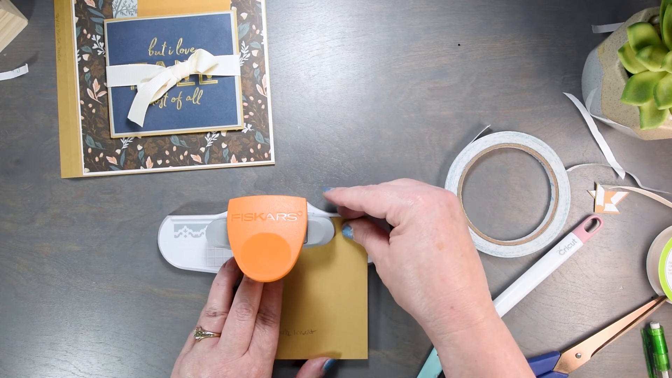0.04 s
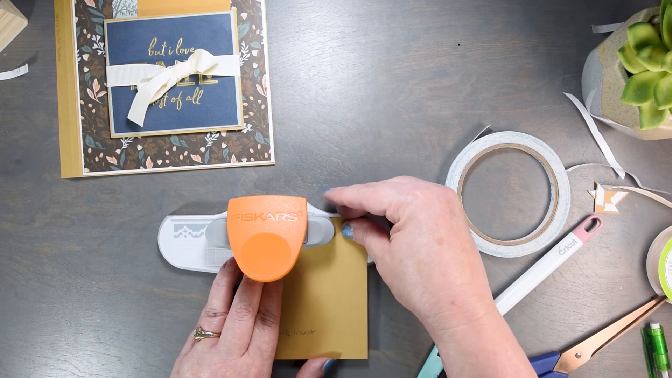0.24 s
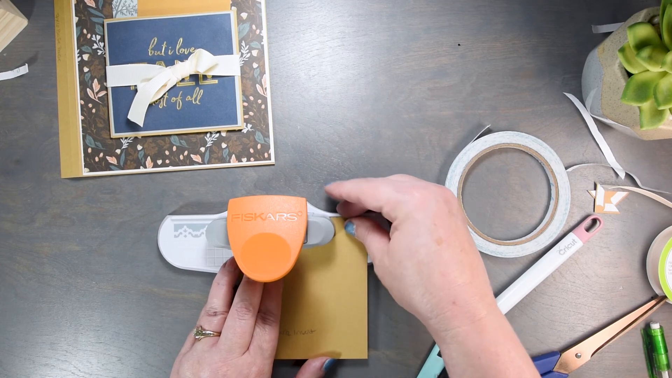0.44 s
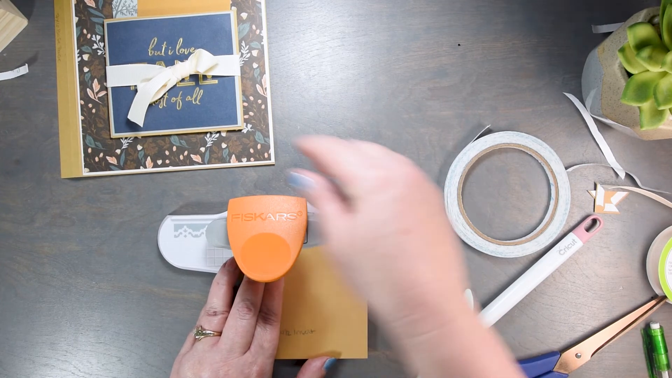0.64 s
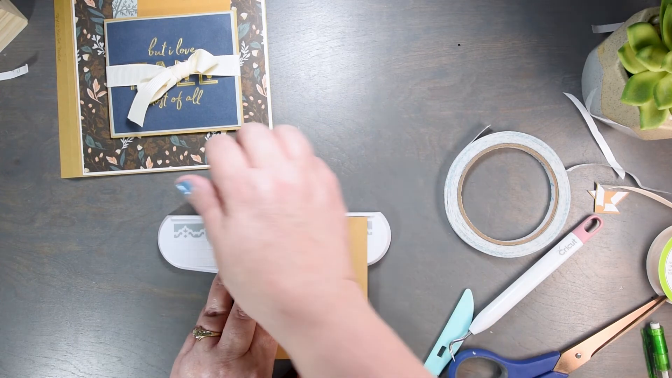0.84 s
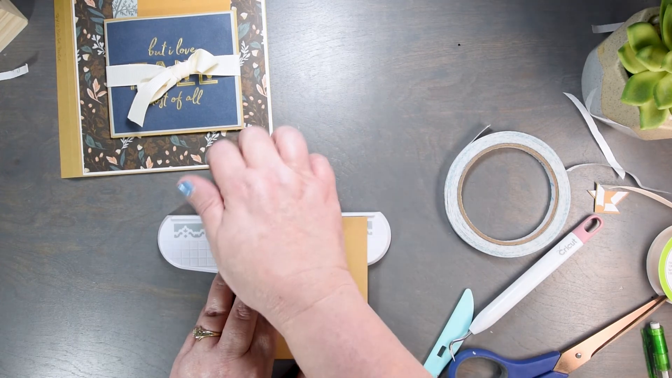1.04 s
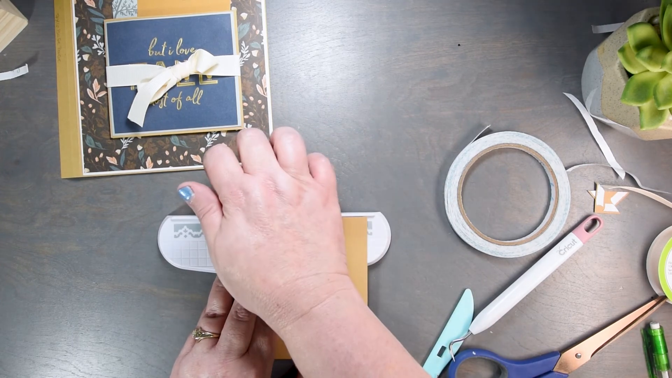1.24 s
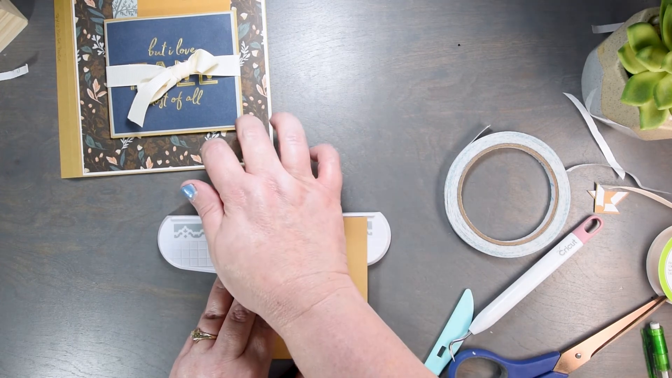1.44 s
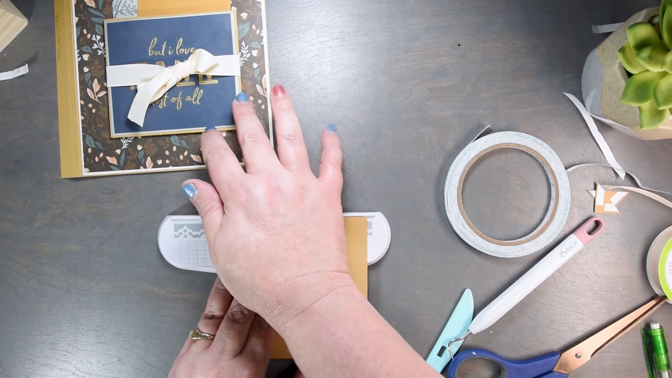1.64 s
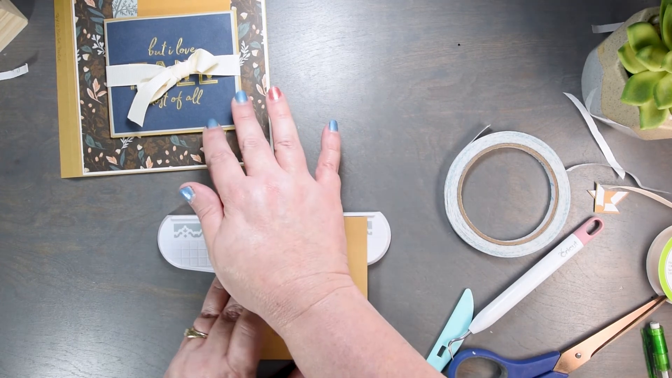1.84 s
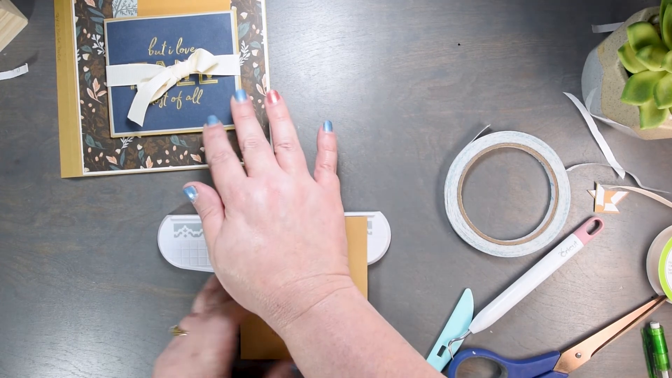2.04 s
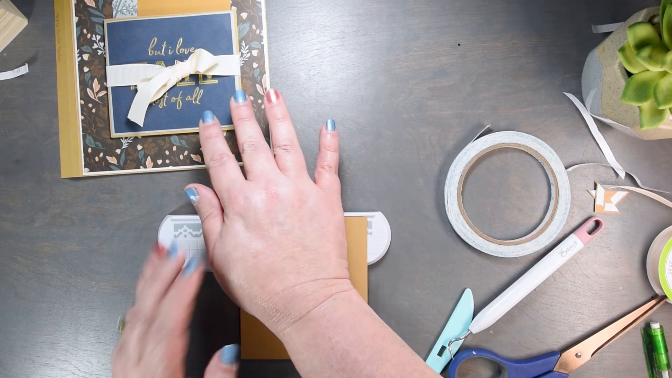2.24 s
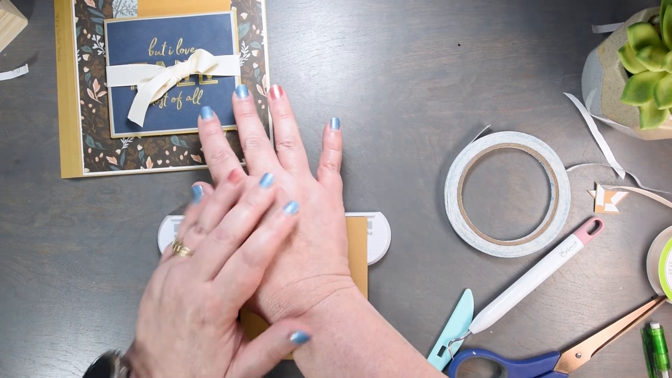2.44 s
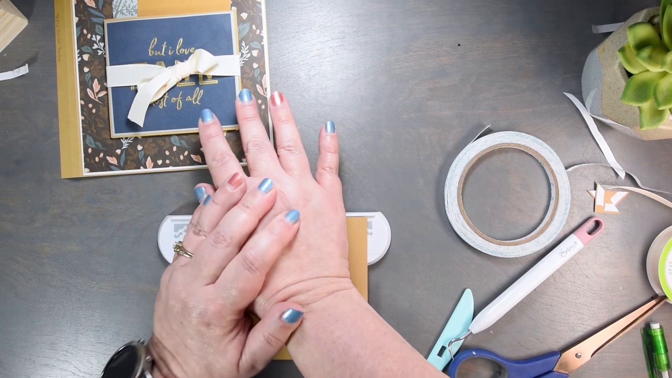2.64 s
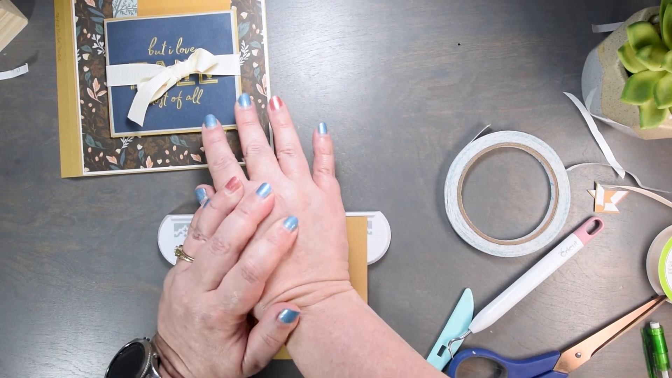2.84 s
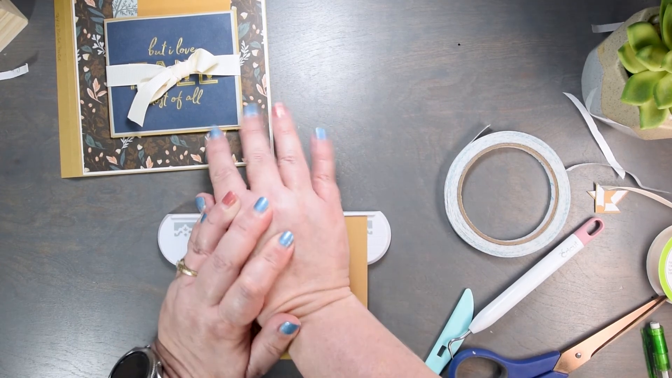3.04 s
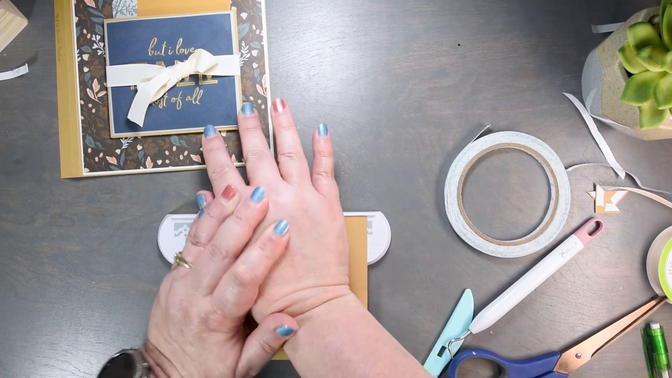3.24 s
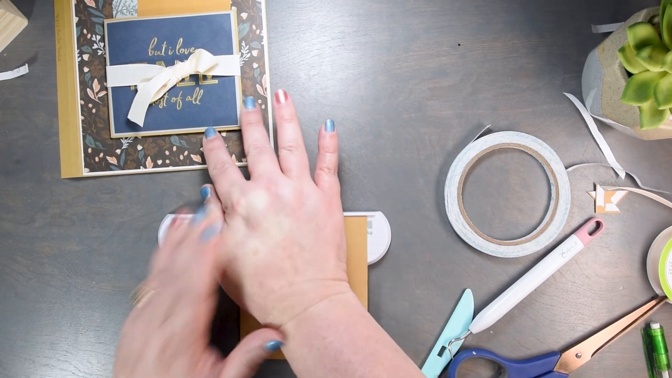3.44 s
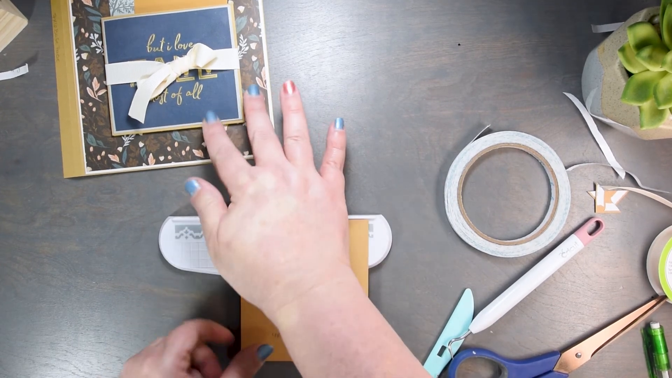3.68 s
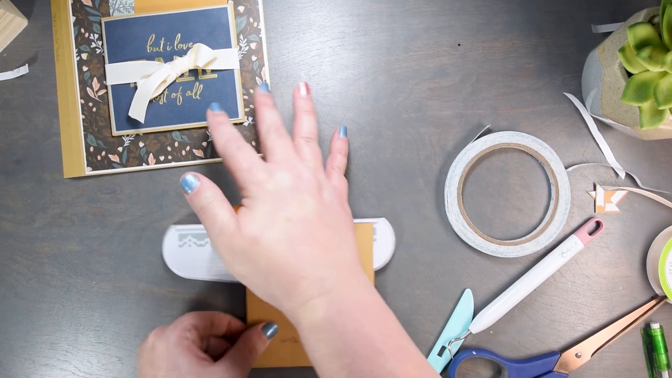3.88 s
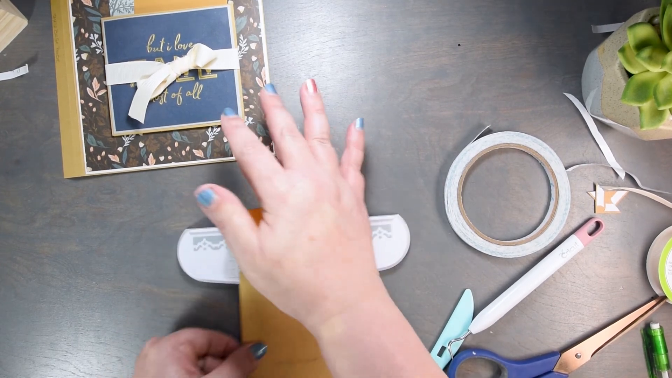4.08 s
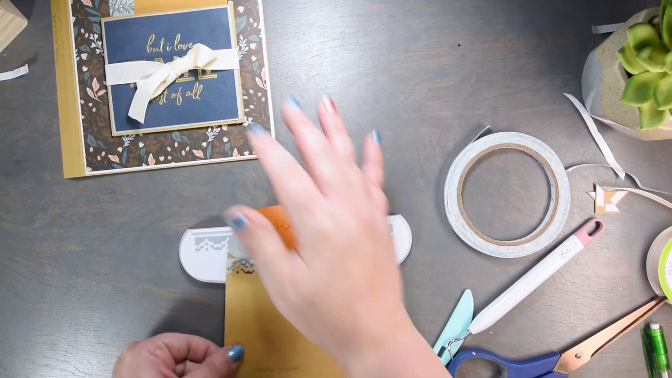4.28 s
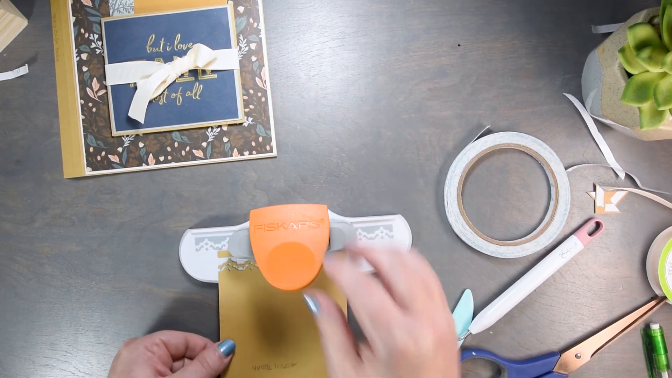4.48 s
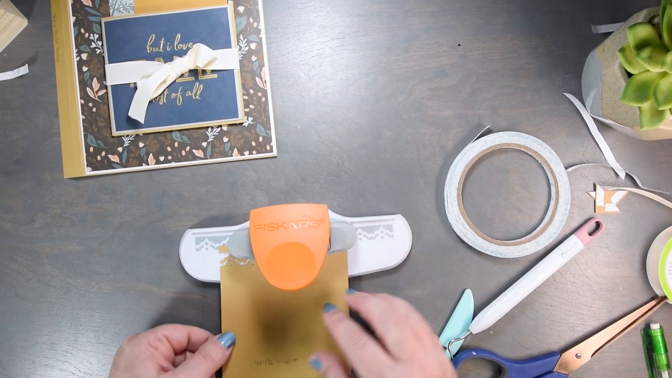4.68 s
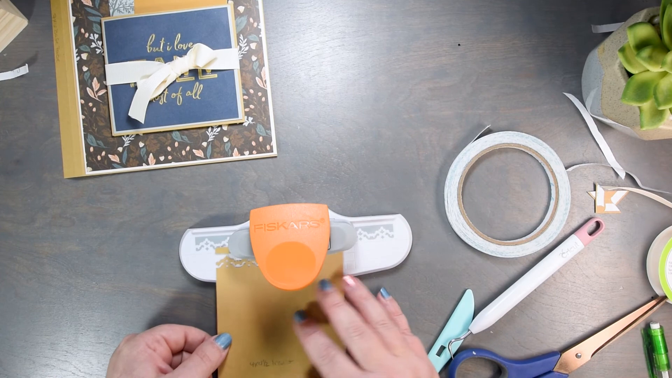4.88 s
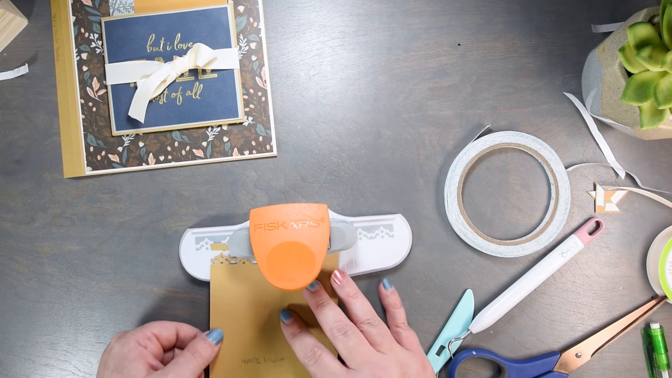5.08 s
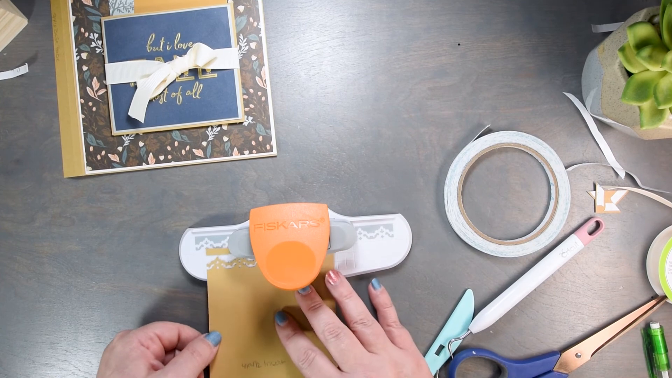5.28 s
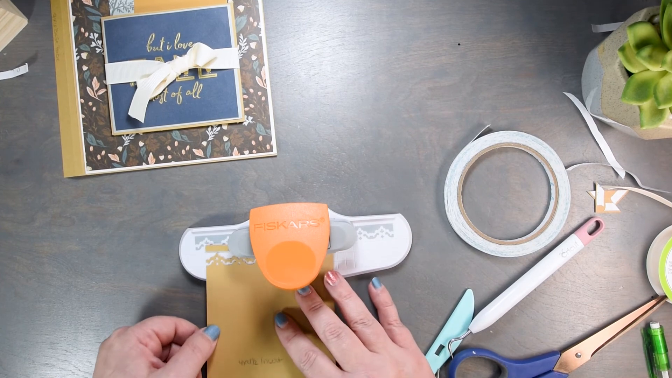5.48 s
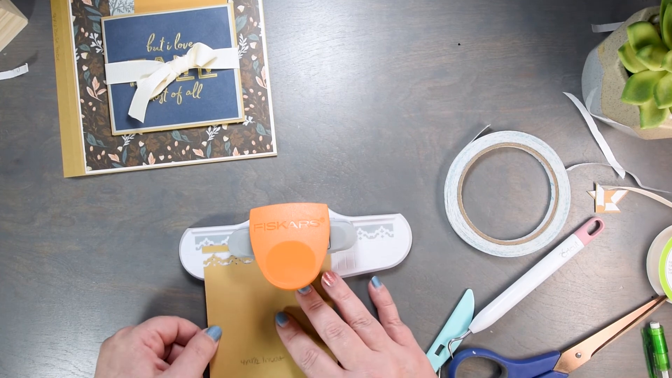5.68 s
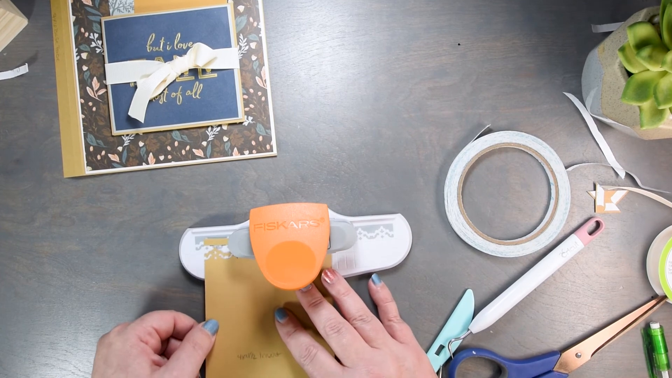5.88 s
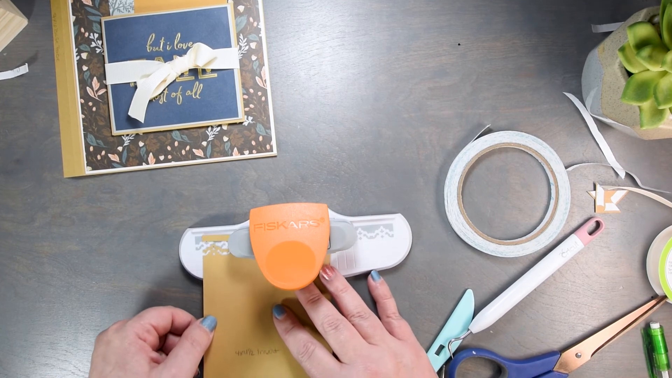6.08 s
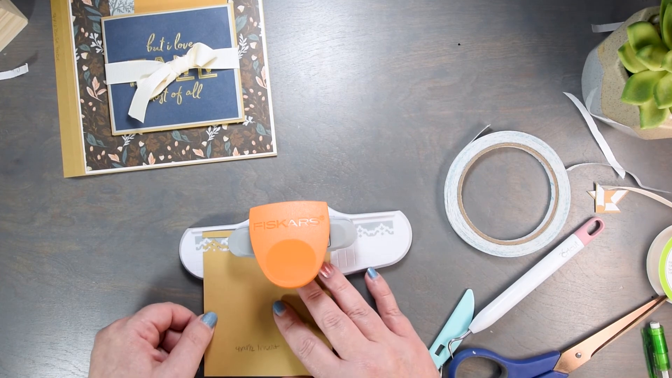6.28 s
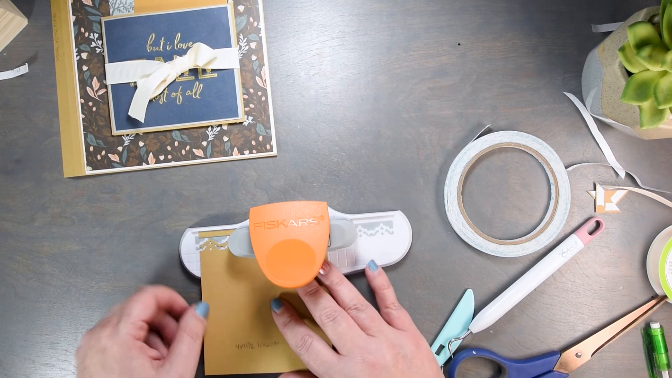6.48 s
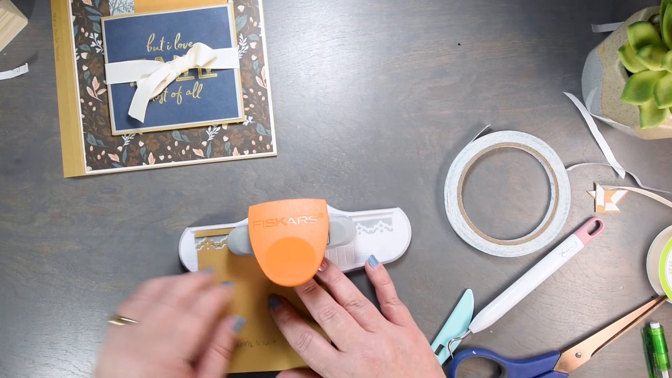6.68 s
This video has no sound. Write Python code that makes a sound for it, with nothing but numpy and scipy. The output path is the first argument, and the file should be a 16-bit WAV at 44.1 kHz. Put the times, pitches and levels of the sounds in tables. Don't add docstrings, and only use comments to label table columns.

```python
import sys
import numpy as np
from scipy import signal
from scipy.fft import rfft, irfft
from scipy.io import wavfile
from scipy.ndimage import uniform_filter1d

SR = 44100
rng = np.random.default_rng(int(sys.argv[2]) if len(sys.argv) > 2 else 0)


def dump(signal):
    limited = np.clip(np.atleast_2d(signal).T, -1, 1)
    pcm = np.round(limited * 32767).astype(np.int16)
    wavfile.write(sys.argv[1], SR, pcm)


def decibels_to_gain(level_db):
    exponent = np.asarray(level_db, float) / 20
    return 10 ** exponent


N = 296352
CONTROL_STEP = 32

# frequency in Hz, width in Hz, level in dB.
TABLE_MODES = [(136, 18, -10.5), (180.7, 32, 1), (212, 67, -1), (296, 11, -7)]
# frequency in Hz, width in Hz, level in dB.
BASE_MODES = [(364, 89, -7), (508.7, 53, -0.5), (591, 64, -2.5), (732, 83, -4), (859, 45, -2.5),
              (993, 140, -7), (1190, 93, -1.5), (1346, 170, -4)]
# frequency in Hz, width in Hz, level in dB.
DIE_MODES = [(1616, 230, -3), (1820, 150, 0), (1980, 170, -1.5), (2350, 180, -2), (2570, 140, -3.5),
             (2904, 160, 0), (3537, 220, -4), (3680, 300, -5)]


def unit(x):
    return x / np.sqrt(np.mean(x ** 2))


def ring(x, modes, spread_db=0., turn=-1):
    f = np.fft.rfftfreq(len(x), 1 / SR)
    spread_db = spread_db + np.zeros(len(modes))
    body = 0
    for k, ((hz, width_hz, db), extra_db) in enumerate(zip(modes, spread_db)):
        loss = 1j * f * width_hz
        body = body + turn ** k * decibels_to_gain(db + extra_db) * loss / (hz ** 2 - f ** 2 + loss)
    return irfft(rfft(x) * body, len(x))


def walk(rate_hz):
    hold = int(SR / rate_hz)
    steps = np.repeat(rng.standard_normal(N // hold + 1), hold)
    return 1.3 * uniform_filter1d(uniform_filter1d(steps, hold), hold)[:N]


def band(lo_hz, hi_hz, size=N):
    sos = signal.butter(2, [lo_hz, hi_hz], "band", fs=SR, output="sos")
    return unit(signal.sosfilt(sos, rng.standard_normal(size)))


def swell(at_s, rise_s, fall_s, db, roundness=1):
    t = np.arange(0, N, CONTROL_STEP) / SR - at_s
    away = np.where(t < 0, -t / max(rise_s, .003), t / max(fall_s, .003))
    return decibels_to_gain(2 * (db - 20 * away ** roundness))


def smooth(control):
    return np.interp(np.arange(N), np.arange(0, N, CONTROL_STEP), control)


def knocks(events, crunch_ms, favour_db, lean_db, dull_db, gains_db):
    # frequency in Hz, width in Hz, level in dB.
    crack_modes = [(4410, 500, 3.5), (5270, 590, 1.5), (6090, 900, -0.5), (7320, 1300, -3.5),
                   (8880, 1400, -5.5), (11573, 1400, -13), (14500, 3500, -14.5)]
    size, thud_ms = 8192, 1.5
    seam_hz, seam_octaves = 1600, 0.19
    out = np.zeros((2, N + size))
    t = np.arange(size) / SR
    push = np.minimum(t / .0004, 1) * np.exp(-t / crunch_ms * 1000)
    highpass = signal.butter(4, 140., "high", fs=SR, output="sos")
    thrust = -signal.sosfilt(highpass, t * np.exp(-t / thud_ms * 1000))
    impulse = 1. * (t == 0)
    fade = np.clip((.17 - t) / .04, 0, 1)
    for s, body_db, crack_db, table_db, favour_hz in events:
        side_db = lean_db * np.tanh(np.log2(seam_hz / favour_hz) / seam_octaves)
        levels_db = crack_db, table_db, body_db + side_db, body_db - side_db
        snaps = push * rng.standard_normal(size) * decibels_to_gain(3. * rng.exponential(size=size))
        start = int(s * SR)
        bodies = crack_modes, TABLE_MODES, BASE_MODES, DIE_MODES
        for modes, db, gain_db in zip(bodies, levels_db, gains_db):
            mode_hz = np.array(modes)[:, 0]
            spot_db = favour_db * np.exp(-(np.log(mode_hz / favour_hz) / .15) ** 2)
            if modes is DIE_MODES:
                spot_db -= dull_db * np.maximum(np.log2(mode_hz / max(favour_hz, seam_hz)), 0)
            if modes is TABLE_MODES:
                hit = ring(thrust, modes, turn=0.98)
            else:
                hit = ring(snaps, modes, spot_db)
            hit *= decibels_to_gain(db + gain_db) / np.abs(hit).max()
            around = unit(ring(impulse, modes, spot_db / 2)) * np.sqrt(np.mean(hit ** 2))
            out[:, start:start + size] += np.array([hit, around]) * fade
    return out[:, :N]


def die_slips():
    # start in s, punch body level in dB, crack peak in dB, table level in dB, favoured ring in Hz.
    slips = [(0.9497, -32.5, -38, -36, 1233), (1.1471, -28, -33, -27.5, 1702),
             (1.3737, -18, -17.5, -15.5, 1287), (1.9743, -2, 0.5, -16.5, 1218),
             (2.2183, -37.5, -28, -51, 482), (2.5895, -23, -12.5, -23.5, 2381), (2.8264, -8, -2, -14, 850),
             (3.0439, -1, -3, -11, 3000), (3.0465, -4, 7.5, -8, 2380), (3.0523, 0.5, -3, -9.5, 1153),
             (3.0634, -4.5, -5.5, -14.5, 861.4),
             (3.041, -24, -24, -40, 1502),
        (3.042, -16, -16, -39.5, 2423),
    ]
    return knocks(slips, 4.2, 9.8, 1.5, 1.2, (1.5, 10.5, 6.8, 10.))


def press_ticks():
    # start in s, punch body level in dB, crack peak in dB, table level in dB, favoured ring in Hz.
    ticks = [
        (0.4635, -71.5, -67, -75, 2880),
        (0.585, -58, -77, -60, 2270),
        (1.0968, -61, -64, -51.5, 1920),
        (1.5804, -56, -52, -47.5, 1944),
        (1.6402, -49, -44, -48, 423),
        (1.6592, -46, -41, -46.5, 480),
        (1.8259, -61, -35.5, -71, 3010),
        (2.7253, -54, -41.5, -57, 479.4),
        (2.7545, -54, -54, -55.5, 611),
    ]
    return knocks(ticks, 1.4, 13.0, 4., 1.2, (-1.5, 1.0, 5.5, 8.0))


def handling_taps():
    # start in s, punch body level in dB, crack peak in dB, table level in dB, favoured ring in Hz.
    taps = [(3.5192, -59, -57, -54, 607), (3.6741, -54, -54.5, -42.5, 1440), (3.72, -50, -43.5, -47, 1294),
            (3.7695, -47.5, -66, -54, 1426), (3.858, -39, -63.5, -55, 1190),
            (3.9102, -41, -55.5, -52, 1190), (4.7328, -42.5, -64, -69, 1273), (5.0593, -65, -72, -71, 403),
            (5.1706, -39, -32.5, -68.5, 2140), (5.3451, -53.5, -59, -78, 1370),
            (5.4494, -64, -68, -69.5, 1330), (5.5198, -62, -69, -76.5, 1530), (5.862, -57.5, -66, -65, 701),
            (6.2277, -59.5, -64, -71, 1026), (6.3445, -54, -61, -74, 826), (6.6214, -68, -68.5, -68, 810)]
    return knocks(taps, 3.01, 11.0, 4.48, 9.7, (-2.0, 1.0, 4.0, 8.5))


def spring(blows, paper):
    # frequency in Hz, width in Hz, level in dB.
    coil_modes = [(1882, 4.5, -1.5), (3046, 3, -.6), (3325, 5, -7), (5150, 9, -9)]
    struck_until_s = 3.0
    t = np.arange(N) / SR
    held = np.interp(t, [.9, 1.0, 3.85, 3.95], [0, 1, 1, 0])
    struck = decibels_to_gain(-9) * blows * (t < struck_until_s)
    rubbed = decibels_to_gain(1.5) * held * paper
    return ring(struck + rubbed, coil_modes)


def movements():
    # fastest at s, rise of 20 dB in s, fall of 20 dB in s,
    # sheet level in dB, fibre hiss over the sheet in dB.
    glides = [(.125, -0.56, .03, -70, -17), (.476, -0.21, .03, -73.5, 13), (.59, -1, .1, -63, -12),
              (.75, -0.3, 0.11, -77, -4.5), (1.815, 0.36, .04, -61, -5.5), (1.92, -0.25, .08, -67, -6),
              (2.38, -0.07, .1, -68, -8), (3.545, 0.13, .2, -58.5, -5), (3.66, 0.2, 0.0856, -57, -6),
              (4.088, 0.0964, .12, -36.5, -4.5), (4.17, 0.29, 0.0744, -51, -5), (4.44, 0.06, .046, -53, -9),
              (4.6, .12, .15, -68, -11), (4.89, -0.05, 0.1007, -61.5, -15), (4.985, .05, 0.0395, -55.5, -7),
              (5.185, 0.04, 0.0502, -58, -9), (5.25, 0.2, .07, -62, -11),
              (5.36, 0.06, 0.1193, -61.5, -12.5), (5.683, 0.01, 0.0544, -48, -5), (5.84, 0.1, .1, -63, -11),
              (6.08, 0.37, .15, -65.5, -14.5), (6.4, -0.16, 0.067, -63, -9.5), (6.497, 0.1, .062, -48, -16),
              (6.71, -0.02, .1, -54.5, -18.5)]
    # fastest at s, rise of 20 dB in s, fall of 20 dB in s,
    # sheet level in dB, table drone over the sheet in dB.
    drags = [(1.5, 0.7, .3, -61.5, 8), (1.657, -0.23, 0.1, -62, 8), (2.299, 0.8, .5, -71.5, -4.5),
             (2.74, -0.37, 0.32, -62.5, -0.5), (3.01, 0.28, 0.076, -60, 8.5), (3.3, -0.4, 0.14, -61.5, 1),
             (3.42, 0.07, .2, -70, 7.5), (3.59, 0.23, 0.17, -60, 10.5), (3.68, 0.13, .05, -56, 3),
             (3.77, 0.19, .05, -62, -9), (3.866, 0.29, 0.039, -53, -10), (3.915, 0.24, 0.081, -53.5, -3.5),
             (3.96, -0.3, 0.15, -53, -10), (4.14, 0.28, .11, -52.5, -1), (4.746, 0.16, 0.056, -54, -20),
             (4.79, -0.3, .07, -60.5, -6), (4.9, 0, 0.16, -69.5, 6), (5.165, 0.85, .011, -65.5, -11.5),
             (5.45, 0.27, .25, -65.5, -3.5), (5.8, -0.14, 0.067, -65, -16),
             (6.235, .025, 0.0504, -61.5, -13.5), (6.35, 0.1, 0.09, -56.5, -0.5),
             (6.64, 0.38, 0.097, -70, -11)]
    # lets go at s, rise of 20 dB in s, sheet level in dB, favoured ring in Hz.
    loads = [
        (.92, -2, -88, 1600),
        (1.96, 0.23, -67, 2400),
        (2.571, 0.11, -59, 2570),
        (2.821, 0.0859, -41, 2370),
        (3.04, 0.0216, -30.5, 1916),
    ]
    # fastest at s, rise of 20 dB in s, fall of 20 dB in s, base level in dB.
    scuffs = [
        (1.67, 0.1, 0.041, -58),
        (4.755, 0.07, 0.069, -54),
        (5.13, 0.36, .04, -66),
        (5.42, -0.14, .06, -63.5),
        (5.89, -0.05, 0.062, -57),
        (6.18, 0.3, 0.021, -66.5),
        (6.235, -0.13, 0.039, -66),
        (6.352, -0.04, 0.037, -56),
        (6.62, -0.62, 0.039, -65),
    ]
    drag_hz, roundness = 1400, 1.8
    moves = []  # (power, fibres, base and table over the sheet in dB, ring in Hz)
    for s, up_s, down_s, db, hiss_db in glides:
        moves.append((swell(s, up_s, down_s, db, roundness), (hiss_db, -18, -26), 2098))
    for s, up_s, down_s, db, drone_db in drags:
        moves.append((swell(s, up_s, down_s, db), (-16.5, -2.5, drone_db), drag_hz))
    for s, up_s, db, hz in loads:
        moves.append((swell(s, up_s, 0.014, db), (-9, 3, 8), hz))
    sheet_db, fibre_db, table_db = -12, -30, -12
    scuff_over_db = fibre_db - sheet_db, -sheet_db, table_db - sheet_db
    for s, up_s, down_s, db in scuffs:
        moves.append((swell(s, up_s, down_s, db + sheet_db, roundness), scuff_over_db, drag_hz))
    rest_hz = 1900
    rest = decibels_to_gain(2 * np.array((-82.5, -91, -85, -86)))[:, None]
    power = rest + sum(p * decibels_to_gain(2 * np.array([0, *over_db]))[:, None] for p, over_db, _ in moves)
    ring_hz = (rest[0] * rest_hz + sum(p * hz for p, _, hz in moves)) / power[0]
    return [smooth(np.sqrt(p)) for p in power], smooth(ring_hz)


def slides():
    # frequency in Hz, width in Hz, level in dB.
    sheet_modes = [(1040, 280, -5), (1630, 270, -4.5), (2113, 140, -2), (2668, 260, -5), (3200, 240, -2),
                   (3920, 700, -7), (4570, 460, -14)]
    # frequency in Hz, width in Hz, level in dB.
    fibre_modes = [(5060, 1300, -1), (7750, 1000, 1), (8820, 580, -2.5), (13500, 2600, -13)]
    levels, ring_hz = movements()
    drag = decibels_to_gain(2.6 * walk(70) + 0.96 * walk(200))
    grains = []
    for _ in range(4):
        noise = rng.standard_normal(N)
        grains.append(noise * decibels_to_gain(2.2 * rng.exponential(size=N) + 1.2 * walk(25)) * drag)
    crisp = (levels[1] / levels[0] / decibels_to_gain(-6.5)) ** .7
    sheet, power = 0, 0
    for k, mode in enumerate(sheet_modes):
        hz, width_hz, db = mode
        gain = decibels_to_gain(db + 7.5 * np.exp(-(np.log(hz / ring_hz) / 0.21) ** 2))
        if hz > 2800:
            gain = gain * crisp
        sheet = sheet + (-1) ** k * gain * ring(grains[0], [mode]) / decibels_to_gain(db)
        power = power + gain ** 2 * width_hz
    sheet = sheet / np.sqrt(power)
    others = [ring(x, m) for x, m in zip(grains[1:], (fibre_modes, BASE_MODES, TABLE_MODES))]
    return sum(g * unit(x) for g, x in zip(levels, [sheet] + others))


def room(x):
    # frequency in Hz, level in dB, t60 in s.
    echo = [(60.02, -6, .4), (150, -8, 0.17), (357, -2.5, 0.22), (850, 2, 0.25), (1819, 1.5, 0.26),
            (4070, 0.5, 0.23), (7740, 3, 0.21), (15090, -3, 0.14)]
    t = np.arange(SR // 2) / SR
    echo_hz, echo_db, echo_t60_s = np.transpose(echo)
    answer = 0
    for hz in 70 * 2 ** np.arange(0, 8, .5):
        db = np.interp(np.log(hz), np.log(echo_hz), echo_db)
        t60_s = np.interp(np.log(hz), np.log(echo_hz), echo_t60_s)
        noise = band(hz / 2 ** .25, hz * 2 ** .25, size=len(t))
        answer = answer + decibels_to_gain(db - 60 * t / t60_s) * np.sqrt(hz) * noise
    answer *= np.clip((t - .002) / 0.0066, 0, 1)
    return signal.fftconvolve(x, answer / np.sqrt(np.sum(answer ** 2)))[:N]


def stand():
    # frequency in Hz, width in Hz, level in dB.
    stand_modes = [(24.2, 9.2, 2), (36, 3.8, -1.5)]
    # jolt at s, sway in dB, rocking in dB, quick shake in dB.
    jolts = [(-.05, -58, -55, -75), (.45, -57.5, -71, -83), (.8, -70, -70, -70), (1.1, -34.5, -47, -62),
             (1.374, -53.5, -56.5, -55), (1.62, -50, -61, -75), (1.8, -46, -59.5, -69),
             (1.974, -41.5, -39, -34.5), (2.218, -49, -52, -63), (2.4, -69, -52.5, -80),
             (2.6, -35.5, -54.5, -56.5), (2.826, -28.5, -32, -33), (3.05, -12.5, -16.5, -24.5),
             (3.2, -32, -31, -53), (3.53, -37, -49, -61), (3.75, -40, -67, -63.5), (3.95, -43.5, -66, -58),
             (4.2, -50, -73.5, -69.5), (4.45, -59.5, -68.5, -75.5), (5.5, -55.5, -70, -75),
             (6.17, -75.5, -73, -65)]
    # peak after the jolt in s, rise of 20 dB in s, fall of 20 dB in s, level at rest in dB.
    motions = [
        (0.15, 0.3054, 0.18, -67),
        (0.025, 0.1, .22, -78.5),
        (0.04, 0.07, .11, -82),
    ]
    moves = band(9., 13.), unit(ring(band(18., 44.), stand_modes)), band(48., 75.)
    jolt_s, *jolt_db = np.transpose(jolts)
    total = 0
    for x, (lag_s, up_s, down_s, rest_db), levels_db in zip(moves, motions, jolt_db):
        power = sum(swell(s + lag_s, up_s, down_s, db) for s, db in zip(jolt_s, levels_db))
        total = total + x * smooth(np.sqrt(decibels_to_gain(2 * rest_db) + power))
    return total


def air():
    # frequency in Hz, level in dB per Hz.
    tone = [(53, -34.5), (90, -5.5), (176, -6), (400, -12.5), (1100, -19), (1800, -14.5), (4000, -21.5),
            (15500, -24)]
    hz, db = np.transpose(tone)
    f = np.fft.rfftfreq(N, 1 / SR)
    colour = decibels_to_gain(np.interp(np.log(f + 1), np.log(hz), db))
    hiss = unit(irfft(rfft(rng.standard_normal(N)) * colour, N))
    return decibels_to_gain(-71.5 + .4 * walk(1.3)) * hiss


def scene():
    blows, blows_around = die_slips()
    ticks, ticks_around = press_ticks()
    taps, taps_around = handling_taps()
    paper = decibels_to_gain(-1.5) * slides()
    around = blows_around + decibels_to_gain(-4) * (ticks_around + taps_around) + decibels_to_gain(-5.5) * paper
    punch = blows + ticks + taps + spring(blows_around, paper)
    return (punch + paper + decibels_to_gain(-9) * room(around) + stand() + air())[None]


def low_pass(x):
    return signal.sosfilt(signal.butter(12, 15680, fs=SR, output="sos"), x)


def record(dry):
    lowpass = signal.ellip(6, .2, 50, 15600, fs=SR, output="sos")
    mix = np.clip(signal.sosfilt(lowpass, dry), -1, 1)
    return low_pass(mix)


dry = scene()
out = record(dry)
dump(out)
```